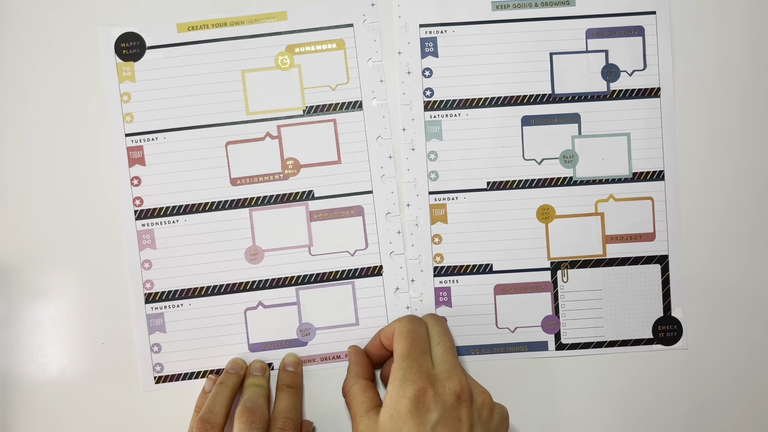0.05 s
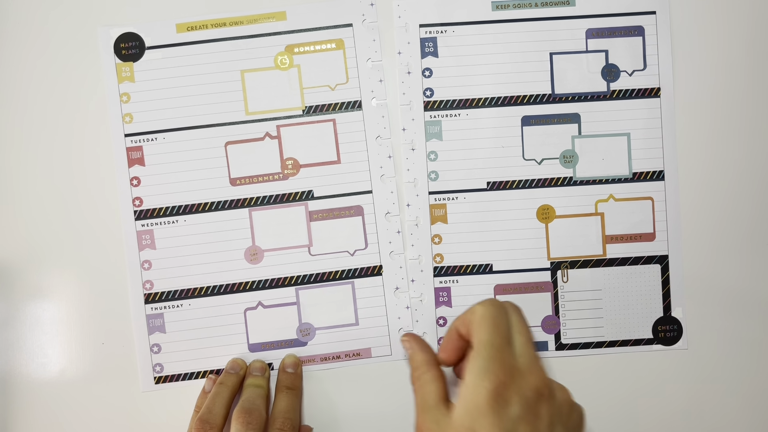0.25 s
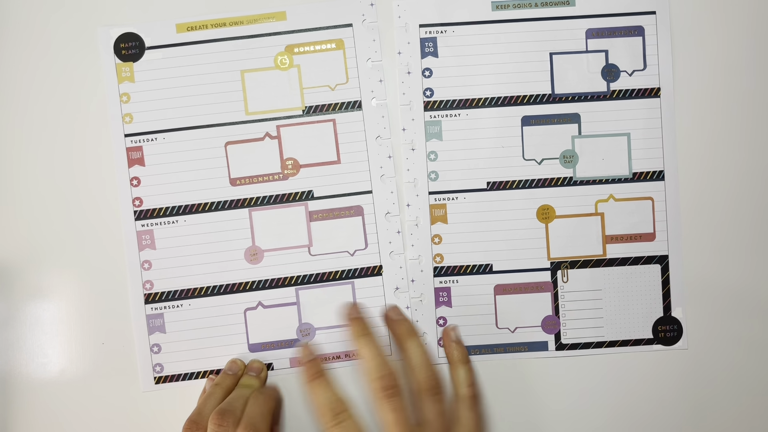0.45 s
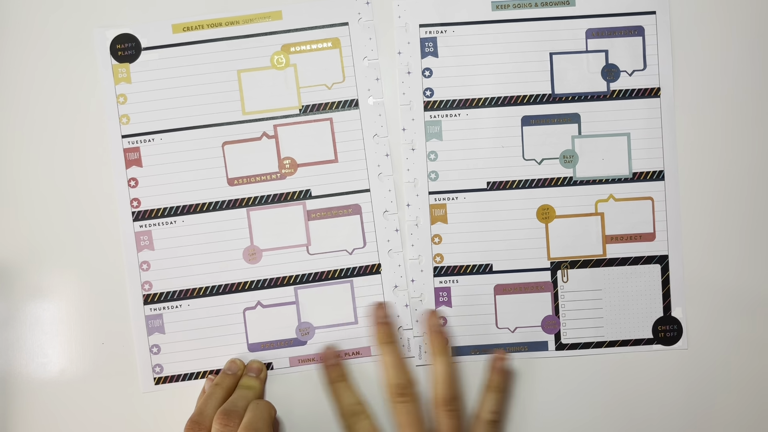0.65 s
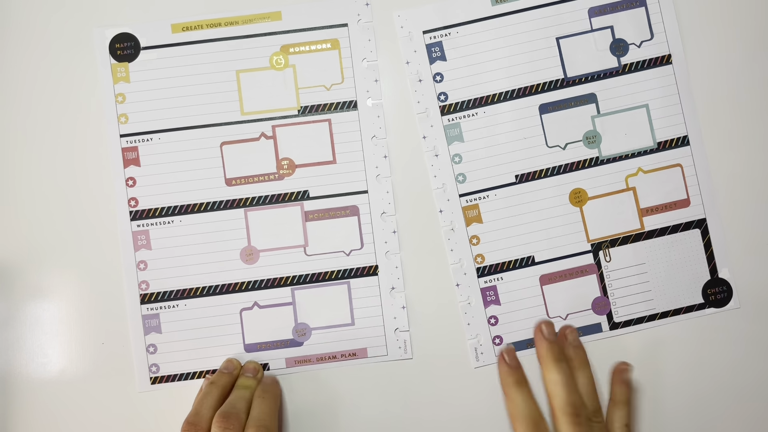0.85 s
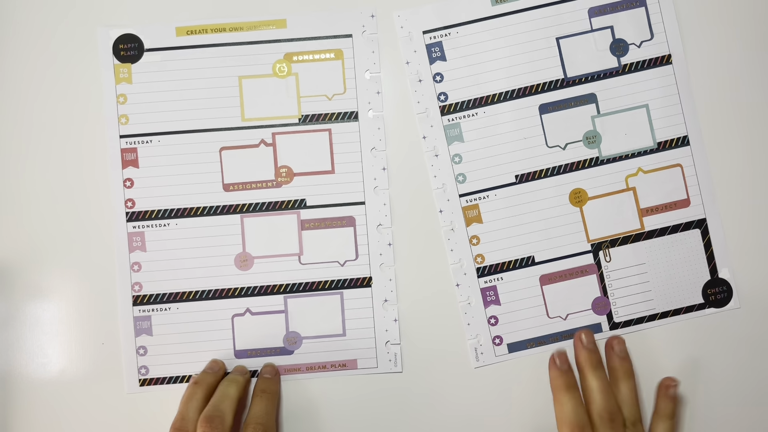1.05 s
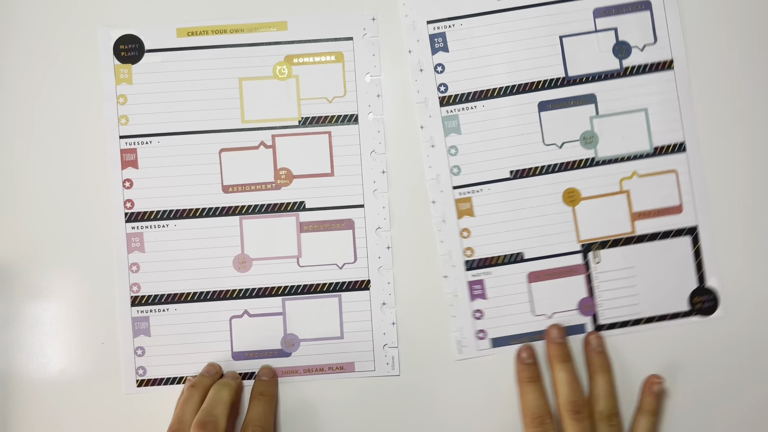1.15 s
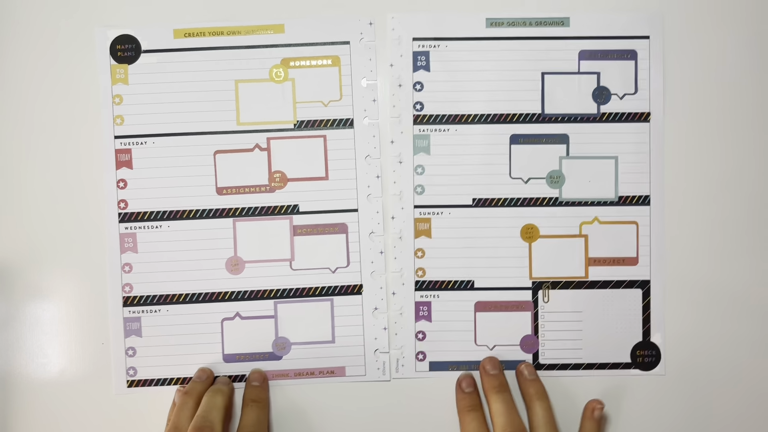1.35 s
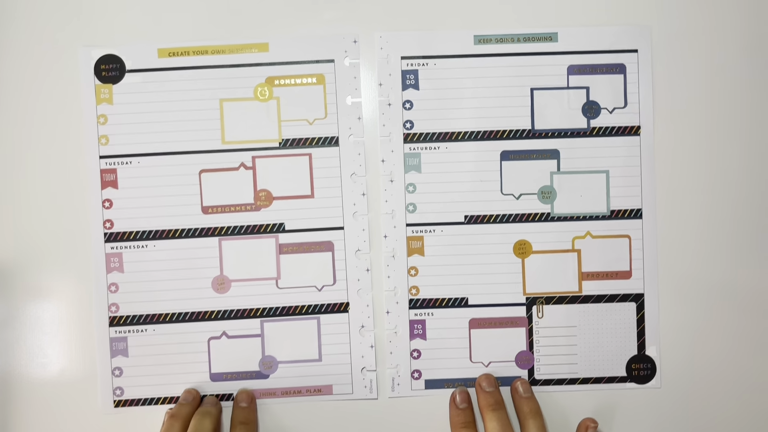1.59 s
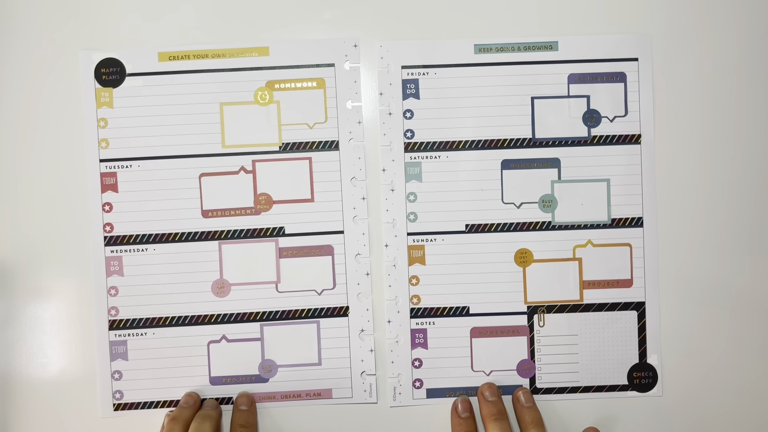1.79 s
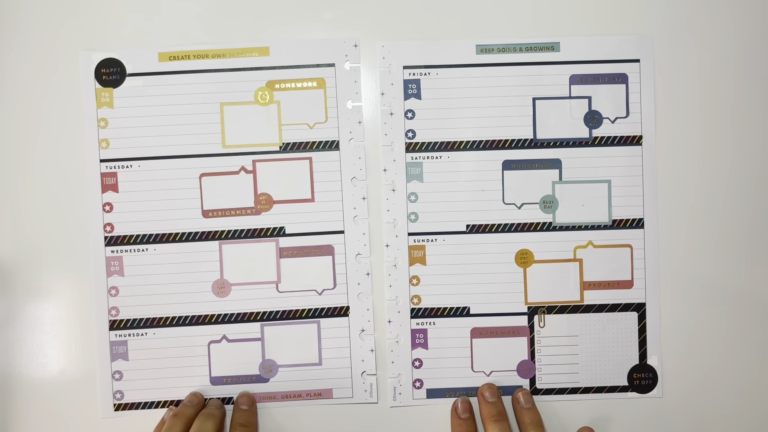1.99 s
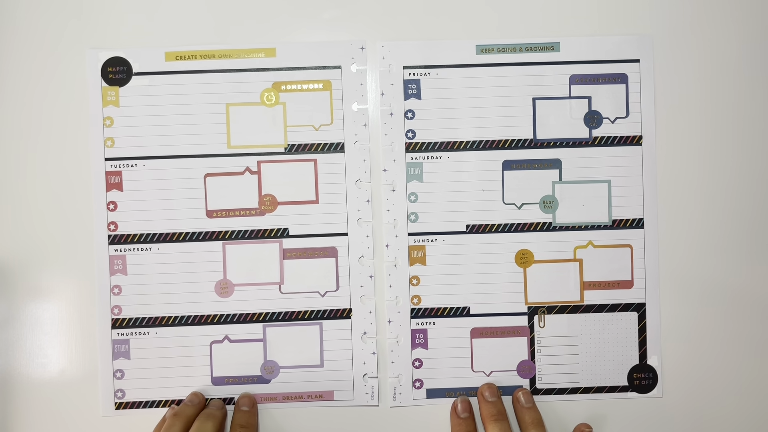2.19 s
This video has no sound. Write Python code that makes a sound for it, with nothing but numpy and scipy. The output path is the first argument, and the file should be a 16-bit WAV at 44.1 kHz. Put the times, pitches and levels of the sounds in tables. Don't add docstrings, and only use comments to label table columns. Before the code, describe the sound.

Paper handled by fingers on a desk: a crisp tap at 0.15 seconds runs into a firm, knocking press until 0.23. Soft rubs and page rustles follow from 0.6 to 0.8, a faint glide near 0.95, brushing strokes from 1.1 to 1.4, then a long airy slide fading by 1.7. Low motor hum, swelling late, and dull floor thuds fill the small room, heard close by phone.

```python
import sys
import numpy as np
from scipy import signal
from scipy.fft import rfft, irfft, next_fast_len
from scipy.io import wavfile
from scipy.ndimage import uniform_filter1d

SR = 44100
rng = np.random.default_rng(int(sys.argv[2]) if len(sys.argv) > 2 else 0)


def put_to_file(sound):
    columns = np.atleast_2d(sound).T
    safe = np.clip(columns, -1, 1)
    whole_steps = np.round(safe * 32767)
    wavfile.write(sys.argv[1], SR, whole_steps.astype(np.int16))


def how_loud(loudness_db):
    steps = np.asarray(loudness_db, float) / 20
    return 10 ** steps


N = 98519

# start_s, length_s, level_db, change_db over the stroke, body_db of the page
STROKES = [(0.086, 0.064, -88.5, 15.5, 0), (0.178, 0.05, -53.5, -1, -0.5), (.29, 0.036, -81.5, -3, 1.5),
           (0.349, 0.021, -64.5, -2.5, -14.5), (0.485, 0.033, -84, 1.5, -2.5), (0.579, 0.034, -69, -5, -14),
           (0.62, 0.11, -58.5, 6.5, -19), (.622, 0.013, -73.5, -2, -2), (0.732, 0.091, -56.5, 4.5, -18),
           (1.125, 0.083, -65.5, 0.5, -14.5), (1.202, 0.0904, -65.5, 7.5, -13.5),
           (1.294, 0.086, -58.5, -5, -16), (0.812, 0.026, -63, -16, -22)]
# freq_hz, level_db
SKIN_SPECTRUM = [(1500, -62), (3500, -26), (5700, -14), (7000, -9), (8400, -4), (10000, -3), (11500, -2.5),
                 (12900, -19)]
# freq_hz, level_db
PAGE_SPECTRUM = [(200, -13), (450, -4), (1100, -3.5), (1500, -9.5), (2200, -3.5), (3500, -8), (5000, -8.5),
                 (7000, -10)]
# freq_hz, level_db, t60_s
DESK_MODES = [(250, -5, .06), (375, -3, .06), (440, 2, .08), (520, -4, .04), (754, -6, .08), (935, -7, .06),
              (995, -6, .06), (1163, -2, .08), (1300, -9, .04), (1780, -13, .04), (2110, -8, .05),
              (2600, -13, .03)]


def unit(x):
    return x / np.sqrt(np.mean(x ** 2))


def curve(table):
    hz, value = np.transpose(table)
    return np.interp(np.log(np.fft.rfftfreq(N, 1 / SR) + 1), np.log(hz), value)


def colour(x, spectrum):
    return unit(irfft(rfft(x) * how_loud(curve(spectrum)), N))


def band(centre_hz, width_hz):
    size = next_fast_len(N)
    hz = np.fft.rfftfreq(size, 1 / SR)
    resonance = 1 / (1 + (2 * (hz - centre_hz) / width_hz) ** 2)
    return unit(irfft(rfft(rng.standard_normal(size)) * resonance, size)[:N])


def walk(rate_hz):
    return band(0, rate_hz)


def grit():
    grain_db = 2
    return rng.standard_normal(N) * how_loud(grain_db * rng.exponential(size=N))


def envelope(t, start_s, length_s, level_db, change_db):
    attack_s, release_s = min(0.21 * length_s, 0.025), 0.013
    rise = np.clip((t - start_s) / attack_s, 0, 1)
    fall = np.exp(-np.maximum(t - start_s - length_s, 0) / release_s)
    progress = np.clip((t - start_s) / length_s, 0, 1)
    return rise * fall * how_loud(level_db + change_db * progress)


def motor(t):
    orders = [(.94, -55.5, 0), (2, -4, 0.95), (3, -37, 0.506), (4, -53, 0.42), (6, -58.5, 0.47)]
    # time_s, level_db
    load = [(0, -91), (.09, -55), (.45, -58.5), (.9, -53), (1.3, -55), (1.56, -58), (1.8, -49), (2.0, -42),
            (2.23, -38.5)]
    shaft_hz, speed_wander, flutter_db, side_db = 43.8, 0.02, 2.0, -20.5
    load_db = np.interp(t, *np.array(load).T)
    phase = 2 * np.pi * np.cumsum(shaft_hz * (1 + speed_wander * walk(3.12))) / SR
    drone = np.zeros(N)
    for multiple, level_db, load_share in orders:
        gain = how_loud(level_db + load_share * load_db + flutter_db * walk(4.7))
        drone += gain * np.sqrt(2) * np.sin(multiple * phase + 0.43 * walk(7))
    return drone, how_loud(side_db) * np.roll(drone, 90)


def room_tone(t):
    # freq_hz, level_db
    rumble_spectrum = [(20, -21.5), (38, -17.5), (65, -6.5), (103, 0.5), (166, -15), (223, -20.5),
                       (720, -36), (3000, -52.5)]
    # time_s, level_db
    settle = [(.2, -77), (.27, -70.5), (.6, -78), (.75, -75)]
    rumble_db, rumble_side_db, hiss_db, hiss_side_db = -58.5, -4, -88.5, -13.5

    def rumble():
        spectrum = [*rumble_spectrum, (9000, -57.5)]
        return how_loud(rumble_db + 1.4 * walk(2.1)) * colour(rng.standard_normal(N), spectrum)

    def hiss():
        return how_loud(hiss_db + 2.4 * walk(2)) * colour(rng.standard_normal(N), SKIN_SPECTRUM)

    murmur_db = np.interp(t, *np.array(settle).T, left=-120, right=-120)
    murmur = how_loud(murmur_db) * band(413, 240)
    high_pass = signal.butter(2, 110, "high", fs=SR, output="sos")
    rumble_side = how_loud(rumble_side_db) * signal.sosfilt(high_pass, rumble())
    return rumble() + hiss() + murmur, rumble_side + how_loud(hiss_side_db) * hiss()


def thuds(t):
    floor_thuds = [(0.074, -46.5, 85.2), (0.179, -43, 68), (0.462, -52, 64), (0.601, -48, 64),
                   (.89, -46, 64), (1.169, -46, 66), (1.392, -48.5, 78.7), (1.648, -48.5, 60),
                   (2.158, -48.5, 65)]
    width_s, mode_db = 0.034, -55.5
    out = how_loud(mode_db) * band(64, 27)
    for peak_s, level_db, pitch_hz in floor_thuds:
        swell = np.exp(-((t - peak_s) / width_s) ** 2)
        out += how_loud(level_db) * np.sqrt(2) * swell * np.cos(2 * np.pi * pitch_hz * (t - peak_s))
    return out


def strokes(t):
    # start_s, length_s, level_db, change_db over the glide
    glides = [
        (0.926, 0.103, -81.5, 6.5),
        (1.026, 0.051, -73.5, -1),
        (1.377, 0.31, -66.5, -3),
        (1.774, .06, -85, 3),
        (1.876, .05, -85, -1),
        (2.068, 0.048, -81.5, -2.5),
    ]
    # freq_hz, level_db
    sheet_spectrum = [(4000, -24), (4700, -14), (5200, -4.5), (6500, -4), (8400, 0.5), (11500, 2.5),
                      (12900, -35)]
    skin_patchy_db, page_patchy_db, sheet_patchy_db, edge_db = 1.07, 1.5, 0.62, -8.5
    skin = sum(envelope(t, *row[:4]) for row in STROKES)
    page = sum(envelope(t, *row[:4]) * how_loud(row[4]) for row in STROKES)
    sheet = sum(envelope(t, *row) for row in glides)
    edge = sum(envelope(t, *row) for row in glides[:2])
    skin = skin * how_loud(skin_patchy_db * walk(65)) * colour(grit(), SKIN_SPECTRUM)
    page = page * how_loud(page_patchy_db * walk(91)) * colour(grit(), PAGE_SPECTRUM)
    sheet = sheet * how_loud(sheet_patchy_db * walk(26)) * colour(grit(), sheet_spectrum)
    edge = edge * how_loud(edge_db) * band(5320, 310)
    return skin + page + sheet + edge


def taps():
    # start_s, knock_db, crack_db, contact_ms
    contacts = [(0.1523, -55.5, -39, 0.21), (.186, -47, -78, 0.71), (.192, -50, -79, .5),
                (.207, -47.5, -51, 0.12), (.214, -51, -49, 0.51), (.575, -70, -65, 0.67),
                (0.351, -82, -77, .3), (0.778, -58, -61, 1), (0.791, -66, -71, 1), (.82, -92, -57, 0.19),
                (1.128, -96, -60.5, .2), (0.224, -69, -49, 0.16), (1.144, -79, -68, 0.36),
                (1.358, -86, -68, 0.24)]
    crack_t60_s, crack_body_db, mode_scatter_db, mode_scatter = 0.051, -6.5, 2.0, 0.006
    out = np.zeros(N)
    u = np.arange(int(SR / 4)) / SR
    crack = colour(grit(), SKIN_SPECTRUM) + how_loud(crack_body_db) * colour(grit(), PAGE_SPECTRUM)
    for start_s, knock_db, crack_db, contact_ms in contacts:
        ring = np.zeros(len(u))
        for hz, level_db, t60_s in DESK_MODES:
            gain = how_loud(level_db + mode_scatter_db * rng.standard_normal())
            mode_hz = hz * (1 + mode_scatter * rng.standard_normal())
            x = hz * contact_ms / 400
            drive = x / (1 + x ** 3)
            ring += gain * drive * np.sin(2 * np.pi * mode_hz * u) * how_loud(-60 * u / t60_s)
        onset_rms = np.sqrt(np.mean(ring[:len(u) // 20] ** 2))
        i = int(start_s * SR)
        out[i:i + len(u)] += how_loud(knock_db) * ring / onset_rms
        out[i:i + len(u)] += how_loud(crack_db - 60 * u / crack_t60_s) * crack[i:i + len(u)]
    return out


def press(t):
    # start_s, level_db, centre_hz
    paper_ticks = [
        (1.143, -62, 1800),
        (1.256, -63, 1550),
        (1.356, -59, 1550),
        (1.368, -60, 260),
        (.782, -57, 420),
    ]
    press_db, sink_db, tick_t60_s = -49, -4, 0.05
    start_s, length_s = STROKES[1][:2]
    drag = unit(sum(how_loud(level_db) * band(hz, 6.1 / t60_s) for hz, level_db, t60_s in DESK_MODES))
    out = envelope(t, start_s, length_s, press_db, sink_db) * drag
    for at_s, level_db, centre_hz in paper_ticks:
        decay_db = -60 * np.maximum(t - at_s, 0) / tick_t60_s
        out += (t > at_s) * how_loud(level_db + decay_db) * band(centre_hz, 0.76 * centre_hz)
    return out


def room_echo(hands):
    t60_s, level_db = 0.12, -6.5
    u = np.arange(SR // 3) / SR
    tail = rng.standard_normal((2, len(u))) * how_loud(-60 * u / t60_s) * (u > 0.004)
    tail = tail / np.sqrt(np.sum(tail[0] ** 2))
    softened = uniform_filter1d(hands, size=4)
    return how_loud(level_db) * signal.fftconvolve(softened[None], tail, axes=1)[:, :N]


def scene():
    pan_db, desk_width_db = -1.1, -9
    t = np.arange(N) / SR
    mid, side = np.add(motor(t), room_tone(t))
    side = side + how_loud(desk_width_db) * press(t)
    around = np.array([mid + side, mid - side]) + thuds(t)
    around = around * how_loud(np.array([[-0.9], [0.9]]))
    hands = strokes(t) + taps() + press(t)
    direct = hands * how_loud(np.array([[pan_db], [-pan_db]]) / 2)
    return direct + room_echo(hands) + around


def top_cut(x):
    return signal.sosfilt(signal.butter(12, 12710, fs=SR, output="sos"), x)


def record(dry):
    # freq_hz, level_db
    port_level = [(100, -1), (600, 2), (1200, 3), (4400, 4), (7900, 3.5), (10300, 0.5), (12300, 3.5)]
    # freq_hz, phase_rad
    port_phase = [(400, 0), (1500, .4), (5000, .5), (7900, 1.), (9300, -1.3), (10250, -3.14), (11200, -4.9),
                  (11900, -6.2)]
    half = np.exp(0.5j * curve(port_phase)) * how_loud(curve(port_level) / 2)
    turn = half ** np.array([[1], [-1]])
    low_cut = signal.butter(2, 44, "high", fs=SR, output="sos")
    mix = signal.sosfilt(low_cut, irfft(rfft(dry) * turn, N))
    return top_cut(mix)


dry = scene()
out = record(dry)
put_to_file(out)
```